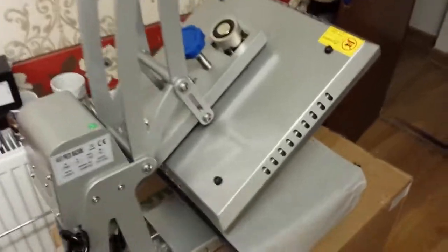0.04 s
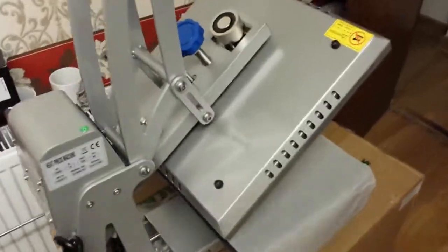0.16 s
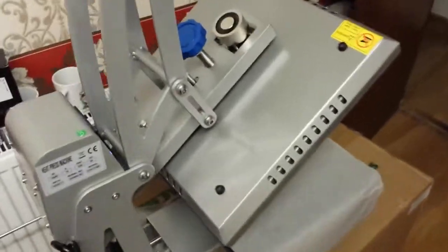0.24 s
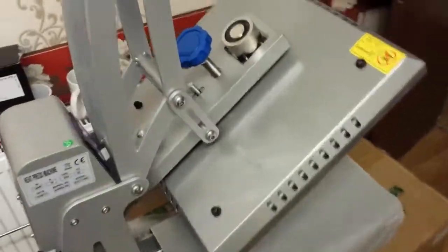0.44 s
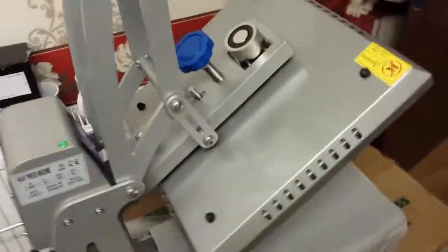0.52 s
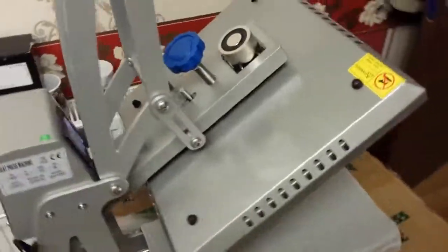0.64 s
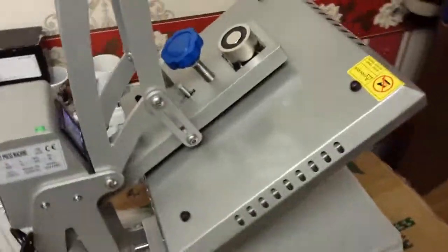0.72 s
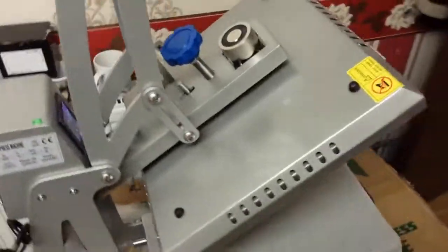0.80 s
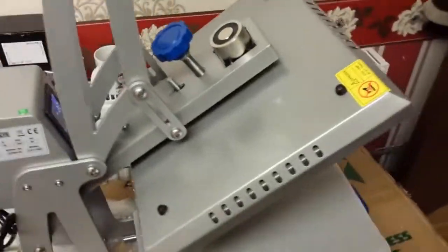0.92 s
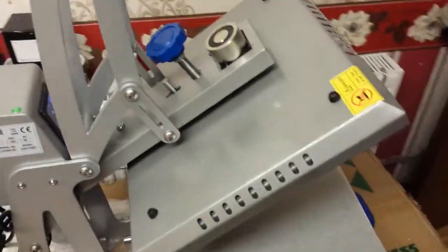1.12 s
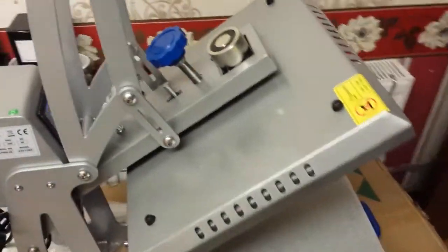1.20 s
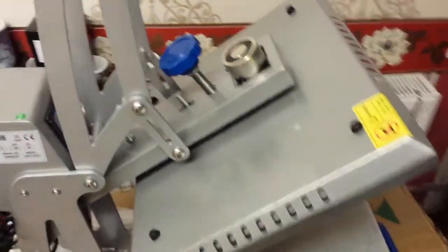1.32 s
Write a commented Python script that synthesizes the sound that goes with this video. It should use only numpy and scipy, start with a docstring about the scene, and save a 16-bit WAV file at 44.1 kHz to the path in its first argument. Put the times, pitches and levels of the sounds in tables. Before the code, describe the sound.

Microphone handling noise: dull scuffs, one hard low thump and light ticks over faint room hiss.

```python
"""A hand shifts its grip on a phone, held over a metal heat press in a quiet room.
Fingers thump the case, once hard by the right microphone, and skin sticks and slips on it
in dull scuffs and a flickering hiss. Knocks rattle the case and its plastic ticks.
A faint metallic ring hangs on after the knocks, over low room rumble and microphone hiss."""
import sys
import numpy as np
from scipy import signal
from scipy.fft import rfft, irfft
from scipy.io import wavfile
from scipy.ndimage import uniform_filter1d

SR = 44100
rng = np.random.default_rng(int(sys.argv[2]) if len(sys.argv) > 2 else 0)


def bounce(signal):
    """Save signal as a 16-bit WAV file at the path given by the first command-line argument."""
    frames = np.transpose(np.atleast_2d(signal))
    limited = np.clip(frames, -1, 1)
    pcm = np.round(limited * 32767).astype(np.int16)
    wavfile.write(sys.argv[1], SR, pcm)


N = 59535  # 1.35 s


def undb(db):
    """Decibels to gain."""
    return 10 ** (np.asarray(db) / 20)


def unit(x):
    """Scale to rms 1."""
    return x / np.sqrt(np.mean(x ** 2))


def colour(x, curve):
    """EQ a signal along a curve of (Hz, dB) points; rms 1."""
    hz, db = np.array(curve, float).T
    bin_hz = np.maximum(np.arange(N // 2 + 1) * SR / N, 1)
    gain = undb(np.interp(np.log(bin_hz), np.log(hz), db))
    return unit(irfft(rfft(x) * gain, N))


def resonate(x, peaks):
    """Boost a signal at (Hz, width Hz, dB) resonances."""
    for hz, width_hz, boost_db in peaks:
        band = signal.lfilter(*signal.iirpeak(hz, hz / width_hz, fs=SR), x)
        x = x + (undb(boost_db) - 1) * band
    return x


def pan(left_db):
    """Stereo gains: the left is trimmed, the right stays at unity."""
    return np.array([[undb(left_db)], [1.]])


def noise():
    """Independent white noise for each microphone."""
    return rng.standard_normal((2, N))


def since(start):
    """Seconds since a moment, zero before it."""
    return np.maximum(np.arange(N) / SR - start, 0)


def mode(start, hz, t60, attack_s=0.0013):
    """A struck sine with a fast attack and an exponential tail."""
    t = since(start)
    decay = np.exp(-np.log(1000) * t / t60)
    return np.sin(2 * np.pi * hz * t) * decay * (1 - np.exp(-t / attack_s))


def wander(rate_hz):
    """Smooth random modulation; rms 1."""
    span = int(SR / rate_hz)
    return unit(uniform_filter1d(uniform_filter1d(rng.standard_normal(N), span), span))


# fader moves of the rubbing hand (time [s], scuff level [dB], skin hiss level [dB])
RUB_FADERS = [(0, -45.5, -62), (0.062, -42, -59.5), (.082, -59, -66), (0.108, -44.5, -58), (.16, -43, -59),
              (.185, -44, -59), (.215, -48, -57.5), (.255, -40, -60), (0.278, -49, -62), (.35, -51.5, -64),
              (.46, -56, -66), (.55, -65.5, -71.5), (.71, -66, -72), (.80, -71, -81), (1.15, -77, -86),
              (1.27, -70, -75), (1.35, -69, -75)]
# case resonances under a rubbing finger (frequency [Hz], width [Hz], boost [dB])
SCUFF_PEAKS = [(211, 27, 5), (301, 50, 4.5), (543, 31, 1), (611, 50, 5)]
# dark EQ of the scuffs (frequency [Hz], gain [dB])
SCUFF_EQ = [(20, -20), (60, 2), (120, -1.5), (240, -1.5), (420, -5.5), (750, -11.5), (1200, -21.5),
            (2500, -28), (8000, -51.5)]
# bright EQ of the skin hiss (frequency [Hz], gain [dB])
SKIN_EQ = [(300, -15), (1200, 3.5), (2500, 0), (4500, 1), (7000, -3), (10000, -1.5), (15500, -3.5)]
SLIPS_PER_S, SLIP_SPREAD_DB, SKIN_FLICKER_DB = 1600, 3, 1.77


def rubbing():
    """Skin sticks and slips on the case: a dull, grainy scuff under a flickering hiss."""
    times, scuff_db, skin_db = np.array(RUB_FADERS).T
    t = since(0)
    sizes = undb(SLIP_SPREAD_DB * np.minimum(rng.exponential(size=(2, N)), 4))
    slipping = rng.random((2, N)) < SLIPS_PER_S / SR
    slips = slipping * np.sign(noise()) * sizes
    scuff = colour(resonate(slips, SCUFF_PEAKS), SCUFF_EQ)
    scuff *= undb(np.interp(t, times, scuff_db))
    skin = colour(noise(), SKIN_EQ)
    skin *= undb(np.interp(t, times, skin_db) + SKIN_FLICKER_DB * wander(rate_hz=75))
    return pan(left_db=-5.5) * scuff + pan(left_db=-1) * skin


# bass-heavy EQ of the room (frequency [Hz], gain [dB])
ROOM_EQ = [(20, -9), (50, -1.5), (130, 2), (200, -9.5), (400, -13.5), (800, -23), (1600, -29.5),
           (4000, -33.5)]
# gently falling EQ of the microphone hiss (frequency [Hz], gain [dB])
HISS_EQ = [(200, 3), (1500, -1), (3000, -1), (6000, -1), (9500, -3), (13000, -4), (16000, -7)]
ROOM_DB, HISS_DB = -62.5, -74.5


def room_tone():
    """A steady bed of low room rumble and microphone hiss."""
    rumble = undb(ROOM_DB) * colour(noise(), ROOM_EQ)
    hiss = undb(HISS_DB) * colour(noise(), HISS_EQ)
    return pan(left_db=-4.5) * rumble + pan(left_db=-2.5) * hiss


# finger thumps (time [s], peak level [dB], contact length [ms], left minus right [dB])
THUMPS = [(.0020, -35.5, 5.1, -12), (0.0263, -45.5, 10.7, -8), (0.0408, -42.5, 4.2, -2),
          (0.082, -43, 7.0, -22), (.1100, -39, 3.2, -28), (0.2152, -10, 3.93, -25.5),
          (0.2521, -32, 2.8, -16), (.2640, -48, 6.6, -21), (0.2833, -31, 8.9, -37),
          (0.319, -35.5, 8.2, -36), (.3670, -31, 2.44, -27), (0.373, -36.5, 6.1, -31),
          (0.393, -40.5, 15, -22), (0.4468, -33, 3.85, -32), (0.4821, -43, 2.6, -12),
          (0.488, -47.5, 9.0, -28), (0.5237, -44, 5.8, -14), (0.612, -47.5, 7.2, -33),
          (.7080, -55, 9.3, -12), (1.041, -49, 4.9, -21), (1.0771, -44, 5.1, -16), (1.2446, -53, 10, -29),
          (1.259, -43, 2.85, -21), (1.3, -40.5, 8.1, -32), (1.3171, -44.5, 2.4, -15)]
PORT_LOW_CUT_HZ = 87


def finger_thumps():
    """A finger pushes fast and lets go more slowly; the microphone port's low cut makes it a swing."""
    out = np.zeros((2, N))
    low_cut = signal.butter(3, PORT_LOW_CUT_HZ, "high", fs=SR, output="sos")
    for start, db, contact_ms, left_db in THUMPS:
        progress = since(start) * 1000 / contact_ms
        push = progress ** 4 * np.exp(-8 * progress)  # peaks halfway through the contact
        swing = signal.sosfilt(low_cut, push + 1e-18)
        out += pan(left_db) * undb(db) * swing / np.abs(swing).max()
    return out


# knocks on the case (time [s], level [dB], left minus right [dB])
KNOCKS = [(.1460, -35, -15), (.1575, -30.5, -24), (.1950, -31.5, -13.5), (.2417, -32, -13),
          (0.2486, -51, -15)]
# boxy modes of the case (frequency [Hz], decay t60 [s], relative level [dB])
CASE_MODES = [(150, .035, -9.5), (312, 0.056, -1.5), (394, 0.042, -3.5), (524, 0.039, -5), (648, 0.02, 2),
              (870, 0.024, -9), (1266, 0.0068, -29)]


def case_knocks():
    """Knocks ring the whole case for a moment; the hand keeps the tail short."""
    return sum(pan(left_db) * undb(db + mode_db) * mode(start, hz, t60, attack_s=0.00054)
               for start, db, left_db in KNOCKS for hz, t60, mode_db in CASE_MODES)


# partials of the metal (frequency [Hz], undamped t60 [s], level [dB], left minus right [dB])
METAL_MODES = [(250.6, 3.13, -54.5, -3), (268, 1.1, -67, -10), (336, 0.79, -73, -14),
               (444, 2.1, -68.5, 2.5), (598, 1.8, -74, 3)]
RING_START_S, DAMPING_START_S, DAMPING_T60_S = 0.243, 0.81, 0.33


def metal_ring():
    """Metal rings faintly after the knocks until it is damped."""
    ring = sum(pan(left_db) * undb(db) * mode(RING_START_S, hz, t60)
               for hz, t60, db, left_db in METAL_MODES)
    damping = np.exp(-np.log(1000) * since(DAMPING_START_S) / DAMPING_T60_S)
    return ring * damping


# ticks of the case (time [s], level [dB])
TICKS = [(0.3284, -32.5), (.3504, -32.5), (0.7867, -38), (1.245, -39)]
# brittle modes of one tick (frequency [Hz], decay t60 [s], relative level [dB])
TICK_MODES = [(345, 0.0026, -14), (1510, 0.00091, -3.5), (4920, 0.0019, -8), (6450, 0.0014, -6.5),
              (9100, 0.00094, -8.5)]


def case_ticks():
    """The plastic case gives tiny, dry snaps, hard right."""
    snaps = sum(undb(db + mode_db) * mode(start, hz, t60, attack_s=0.00003)
                for start, db in TICKS for hz, t60, mode_db in TICK_MODES)
    return pan(left_db=-33) * snaps


def scene():
    """The stereo mix of all sources at the two microphones."""
    return rubbing() + room_tone() + finger_thumps() + case_knocks() + metal_ring() + case_ticks()


# resonances of the right microphone port (frequency [Hz], width [Hz], boost [dB])
PORT_PEAKS = [(3025, 166, 4.5), (5450, 720, 3), (7100, 460, 5.5), (9020, 1100, 4.5)]
HIGH_CUT_HZ = 15800


def record(dry):
    """The right port colours the treble; a steep high cut takes the top off both sides."""
    left, right = dry
    high_cut = signal.ellip(10, .1, 70, HIGH_CUT_HZ, fs=SR, output="sos")
    return signal.sosfilt(high_cut, np.array([left, resonate(right, PORT_PEAKS)]))


dry = scene()
out = record(dry)
bounce(out)
```